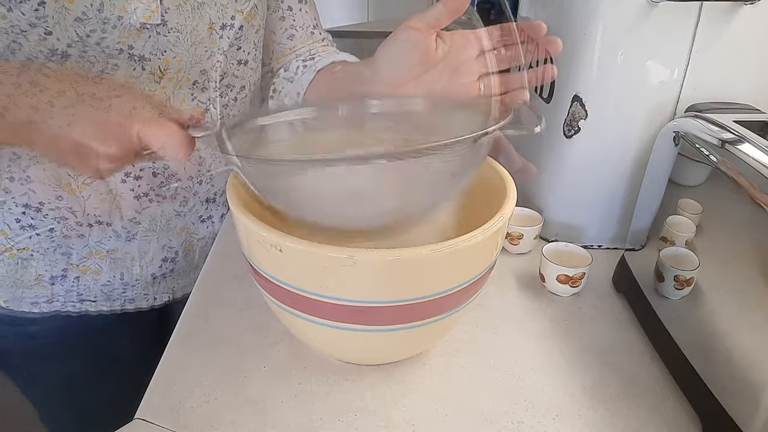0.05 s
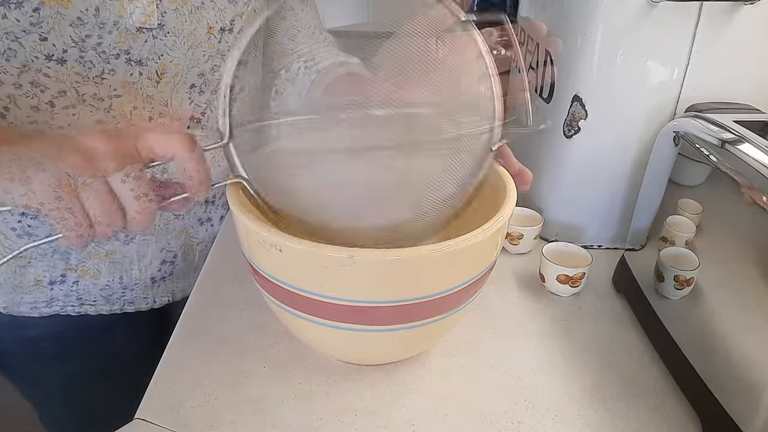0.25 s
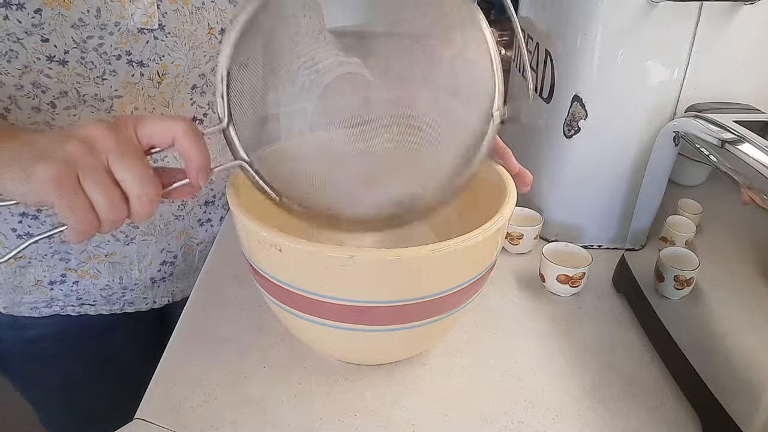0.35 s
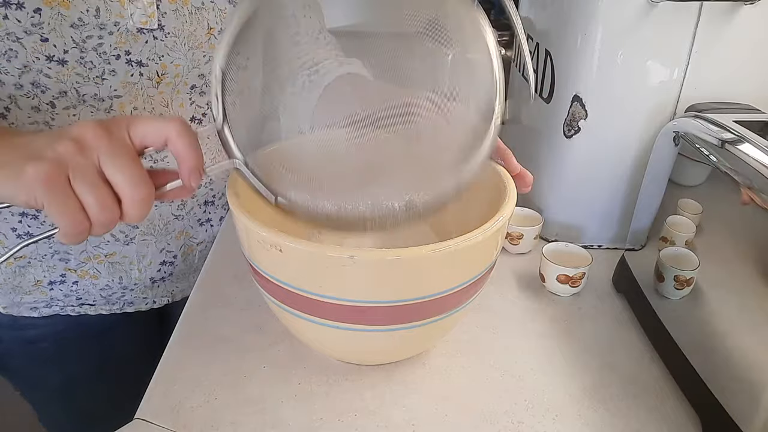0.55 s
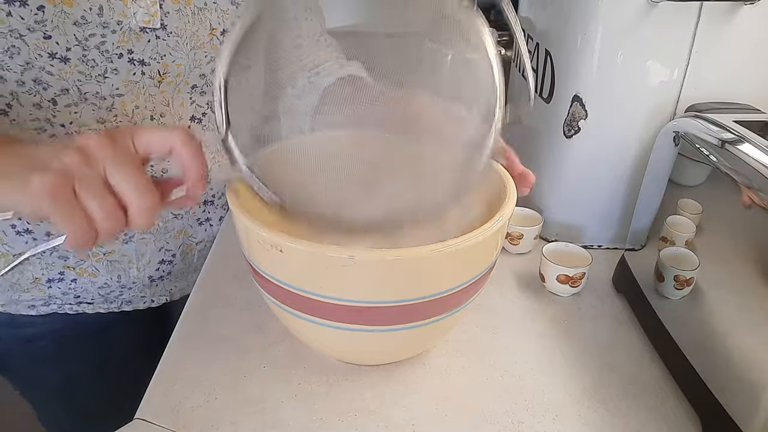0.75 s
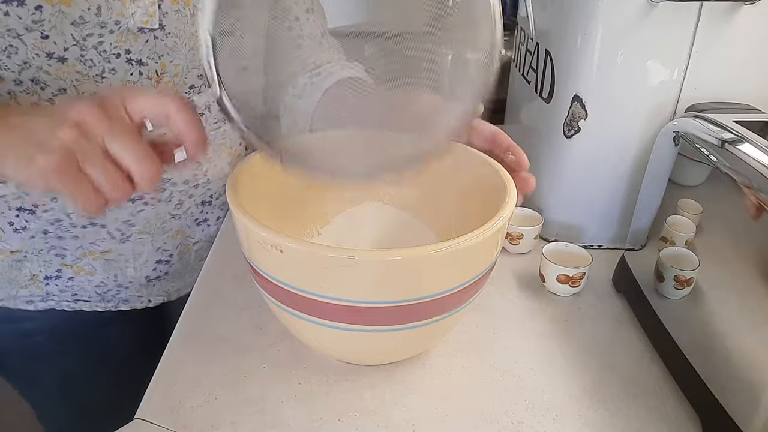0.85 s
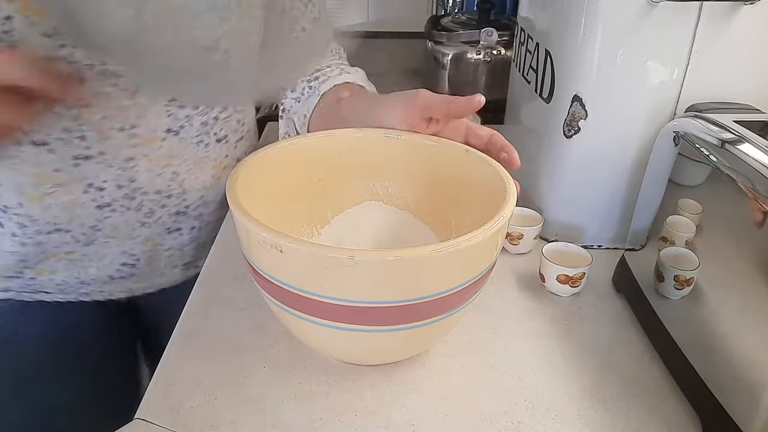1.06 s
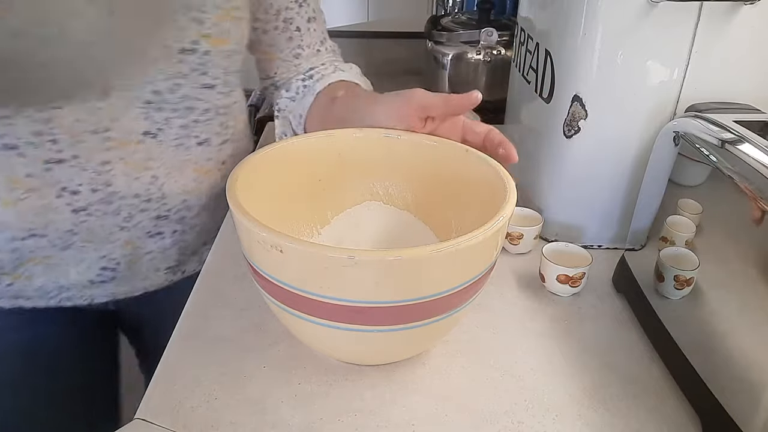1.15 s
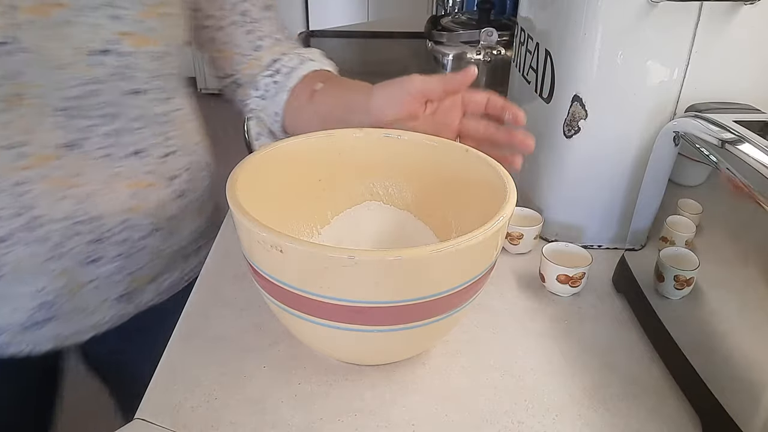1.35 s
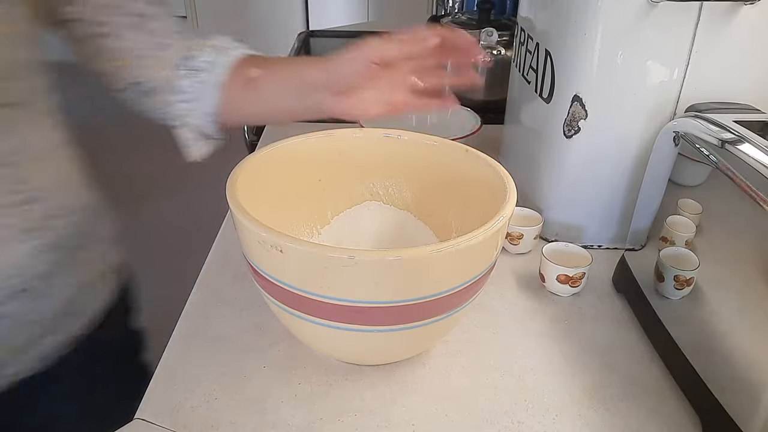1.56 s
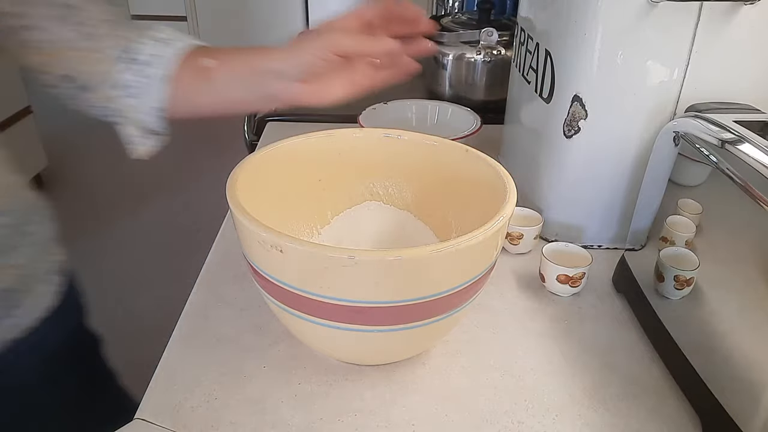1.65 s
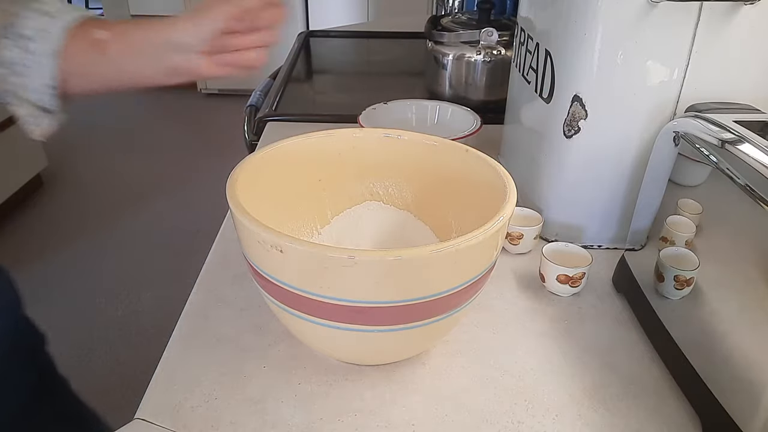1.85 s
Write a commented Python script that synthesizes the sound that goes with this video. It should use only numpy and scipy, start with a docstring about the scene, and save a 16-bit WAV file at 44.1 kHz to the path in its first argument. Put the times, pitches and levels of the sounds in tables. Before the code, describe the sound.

A hand taps the steel rim of a wire mesh sieve three times, each tap louder, with dull thuds and dry rattling mesh, then a barely audible touch and quiet hiss; close microphone in a small kitchen.

```python
"""A soft hiss in a quiet kitchen, then a palm taps the rim of a wire mesh sieve over a bowl:
three times, harder each time, then once barely. Each tap is an impulsive force that excites the
modes of the steel rim, slaps the wire with filtered noise, shakes the mesh into a short dry rattle
of random grains and sets the frame shuddering. Damped sines give dull thuds of hand and frame and,
near 1.8 s, a faint low swell of the background noise; a faint scrape follows the taps as the sieve
is lifted away, and a decaying noise tail rings as the room."""
import sys
import numpy as np
from scipy import signal
from scipy.fft import rfft, irfft
from scipy.io import wavfile

SR = 44100
rng = np.random.default_rng(int(sys.argv[2]) if len(sys.argv) > 2 else 0)


def master_out(mix):
    """Clip the mix to full scale and print it as 16-bit PCM to the path in sys.argv[1]."""
    frames = np.transpose(np.atleast_2d(mix))
    ceiling = np.clip(frames, -1, 1)
    pcm = np.round(ceiling * 32767).astype(np.int16)
    wavfile.write(sys.argv[1], SR, pcm)


N = 83790

# The taps as forces on the rim. Each row: start in seconds, rim level in dB, contact length in seconds,
# rim tuning as a frequency ratio, crack level in dB, mesh rattle level in dB, rattle hold in seconds,
# frame shudder level in dB, shudder t60 in seconds, share of free ring time left by the grip,
# after-touches in dB relative to the contact, top of crack and rattle in Hz, share of force at first touch.
TAPS = [(.1886, -35.5, 0.0055, 0.99, -51, -43.5, 0.055, -35.5, 0.34, 0.59, -6, 5200, 1),
        (0.4296, -30.5, 0.0078, .997, -33.5, -42, 0.036, -30.5, 0.22, 0.67, -5.5, 11000, 0.42),
        (0.6507, -23.5, 0.0071, .995, -24.5, -30, 0.054, -24, 0.26, 0.4, -11.5, 13000, 0.24),
        (0.9233, -74, 0.019, .995, -65.5, -57, 0.039, -52.5, 0.28, 0.9, -6, 5000, 0.97)]


def amp(db):
    """Level law: an amplitude factor is 10 to the power of dB / 20."""
    return 10 ** (np.asarray(db) / 20)


def unit(x):
    """Power normalisation: scales a signal to an rms of 1."""
    return x / np.sqrt(np.mean(x ** 2) + 1e-20)


def at_hz(points, hz):
    """Interpolation along log frequency, where equal ratios are equal steps."""
    points = np.array(points)
    return np.interp(np.log(hz), np.log(points[:, 0]), points[:, 1])


def colour(x, spectrum):
    """Minimum-phase filtering: a folded cepstrum turns a magnitude spectrum into a causal response."""
    bins_hz = np.maximum(np.fft.rfftfreq(2048, 1 / SR), 1)
    log_gain = at_hz(spectrum, bins_hz) * np.log(10) / 20
    cepstrum = irfft(log_gain)
    cepstrum[1:1024] *= 2
    cepstrum[1025:] = 0
    response = irfft(np.exp(rfft(cepstrum)))
    response = response / np.sqrt(np.sum(response ** 2))
    return signal.fftconvolve(x, response)[:len(x)]


def grains(per_s, spread_db):
    """Random impulse process: independent clicks of uneven size and sign, scaled to rms 1."""
    sizes = amp(spread_db * np.minimum(rng.exponential(1, N), 4))
    signed = sizes * rng.choice([-1, 1], N)
    return unit(signed * (rng.random(N) < per_s / SR))


def swell(start, rise, t60, hold=0):
    """Exponential build-up and decay: rises from start; after the hold falls by 60 dB in t60."""
    t = np.maximum(np.arange(N) / SR - start, 0)
    decay = amp(-60 * np.maximum(t - hold, 0) / t60)
    return (1 - np.exp(-t / max(rise, 1e-4))) * decay


def contact(start, length, first):
    """Contact force: jumps to a first share, grows linearly, then falls 25 dB per contact length."""
    t = (np.arange(N) / SR - start) / length
    growth = first + (1 - first) * t
    release = amp(-25 * np.clip(t - 1, 0, 9))
    return np.where(t < 0, 0, np.where(t < 1, growth, release))


def rim():
    """Modal excitation: tiny touches, then looser ones, drive damped modes; the spot sets their shares."""
    # Modes of the steel rim. Each row: frequency in Hz before tuning, free t60 in seconds before the
    # grip shortens it, and level in dB relative to the tap when struck at spot 0, 1 and 2.
    rim_modes = [(847, 0.045, -15, -2.5, -11), (1170, 0.078, 2.5, -3, 2), (1948, 0.18, -3.5, -8, -4.5),
                 (2970, 0.087, -7.5, -15, -24), (3046, 0.081, -15, -11.5, -16),
                 (3750, 0.035, -25, -35, -39), (4220, 0.07, -6, -11, -5.5), (4237, 0.13, -21, -19, -22),
                 (4990, .05, -36, -20, -27), (4940, .05, -32, -21, -22), (6250, .07, -28.5, -13.5, -20),
                 (7040, 0.08, -20.5, -26, -27), (7380, .07, -28, -22, -32), (9360, 0.06, -55, -33, -38),
                 (11040, 0.034, -43, -25.5, -28)]
    # Where on the rim each tap lands, one entry per tap: index of the spot.
    strike_spots = [0, 1, 2, 2]
    after_touch_t60_s = 0.15
    touches = grains(1500, spread_db=3.0)  # touches per second
    out = 0
    for (start, db, length, tuning, *_, grip, after_db, _, first), spot in zip(TAPS, strike_spots):
        after_touches = amp(after_db) * swell(start, length, after_touch_t60_s)
        # The tiny offset keeps the resonator state off subnormal numbers
        drive = touches * (contact(start, length, first) + after_touches) + 1e-18
        for hz, t60, *share_db in rim_modes:
            radius = amp(-60 / (t60 * grip * SR))
            angle = 2 * np.pi * hz * tuning / SR
            poles = [1, -2 * radius * np.cos(angle), radius * radius]
            rung = signal.lfilter([0, np.sin(angle)], poles, drive)
            out = out + amp(db + share_db[spot]) * rung / np.abs(rung).max()
    return out


def crack():
    """Broadband impact noise: the slap of palm on wire follows the contact; softer taps are duller."""
    # Spectrum of the slap. Each row: frequency in Hz, relative density in dB per Hz.
    crack_spectrum = [(300, -35), (700, 2), (1500, -8), (2500, -18.5), (4500, -5.5), (7500, -17),
                      (11000, -31), (16000, -44)]
    noise = rng.standard_normal(N)
    slaps = 0
    for start, _, length, _, db, *_, top_hz, first in TAPS:
        b, a = signal.butter(2, top_hz, fs=SR)
        slaps = slaps + signal.lfilter(b, a, amp(db) * contact(start, length, first) * noise)
    return colour(slaps, crack_spectrum)


def mesh():
    """Stochastic rattle: dense grains in bands swell, hold and decay, the treble mostly soonest."""
    # Bands of the mesh. Each row: centre in Hz, relative level in dB, t60 after the hold in seconds.
    rattle_bands = [(570, -15, 0.74), (1130, 4.5, 0.22), (1850, -1, 0.27), (2780, -0.5, 0.164),
                    (4820, -5, 0.12), (6040, -9, 0.087), (8400, -23.5, 0.28), (13100, -30, 0.14),
                    (15500, -40, .1)]
    rise_s, grains_per_s = 0.032, 3300
    shakes = [grains(grains_per_s, spread_db=3.0) for _ in range(2)]
    out = 0
    for k, (hz, band_db, t60) in enumerate(rattle_bands):
        sos = signal.butter(2, [hz / 1.25, hz * 1.25], "band", fs=SR, output="sos")
        gate = 0
        for start, _, _, _, _, db, hold, *_, top_hz, _ in TAPS:
            treble_loss = 1 + (hz / top_hz) ** 2
            gate = gate + amp(db) * swell(start, rise_s, t60, hold) / treble_loss
        out = out + amp(band_db) * signal.sosfilt(sos, gate * shakes[k % 2])
    return out


def frame():
    """Forced resonance: loose contacts keep the frame and handle shuddering at their low modes."""
    # Frame and handle resonances. Each row: frequency in Hz, bandwidth in Hz, relative level in dB.
    resonances = [(128, 80, -3), (180.6, 69, 6.5), (303, 29, 4), (344.8, 24, -2), (397, 27, -0.5),
                  (466.4, 45.6, 3), (573, 62, 2.5), (712.4, 31, -7), (791, 46, -3.5), (893, 35, -3.5),
                  (1089, 80, -5.5), (1374, 85, -7.5), (1650, 240, -9.5)]
    rise_s, contacts_per_s = 0.013, 800
    shudder = sum(amp(db) * swell(start, rise_s, t60) for start, *_, db, t60, _, _, _, _ in TAPS)
    drive = shudder * grains(contacts_per_s, spread_db=2.5) + 1e-18
    out = 0
    for k, (hz, width_hz, db) in enumerate(resonances):
        radius = np.exp(-np.pi * width_hz / SR)
        # The square root makes up for the power a narrow resonance passes
        zeros = np.array([1, 0, -1]) * (1 - radius * radius) / 2 * np.sqrt(SR / width_hz / 10)
        poles = [1, -2 * radius * np.cos(2 * np.pi * hz / SR), radius * radius]
        sign = (-1) ** k  # neighbouring modes in opposite phase
        out = out + sign * amp(db) * signal.lfilter(zeros, poles, drive)
    return out


def thuds():
    """Damped oscillation: short sines for soft blows of hand and frame, and a faint swell near 1.8 s."""
    # Soft blows of hand and frame, and near 1.8 s a faint low swell of the background noise.
    # Each row: start in seconds, level in dB before the envelope, pitch in Hz,
    # t60 after the hold in seconds.
    damped_sines = [(0.194, -29, 169, 0.036), (0.195, -38.5, 420, 0.047), (.222, -23.5, 195.5, 0.028),
                    (.223, -39, 860, .03), (.228, -38, 1310, 0.021), (0.231, -33, 104, 0.065),
                    (0.257, -43, 90, 0.033), (.247, -32.5, 490, 0.032), (.431, -32, 329, 0.07),
                    (.432, -32, 590, 0.044), (0.439, -24, 187.7, 0.09), (0.434, -34.5, 118, .08),
                    (0.47, -33, 113, 0.083), (0.495, -35, 99.3, 0.087), (0.471, -26.5, 276, 0.029),
                    (0.659, -21, 213, 0.039), (.656, -36, 542, 0.072), (.666, -36, 265, 0.015),
                    (.681, -18, 202.5, 0.077), (0.685, -23, 105, 0.092), (0.69, -18, 323, 0.034),
                    (.696, -29, 785, 0.049), (.704, -21.5, 448, 0.05), (.716, -38, 278, 0.075),
                    (.722, -28.5, 106, 0.038), (0.738, -44, 83, 0.071), (.77, -36.5, 280.5, 0.13),
                    (.927, -49.5, 440, 0.034), (0.939, -49, 324, 0.063), (.943, -51, 636, 0.052),
                    (1.485, -61, 441, 0.14), (1.516, -62, 390, .06), (1.525, -66, 76.5, 0.098),
                    (1.808, -62.5, 323, 0.058), (1.83, -60, 490, 0.054), (1.845, -62.5, 590, 0.062)]
    rise_cycles, hold_cycles = 0.52, 1.06
    t = np.arange(N) / SR
    out = 0
    for start, db, hz, t60 in damped_sines:
        envelope = swell(start, rise_cycles / hz, t60, hold_cycles / hz)
        out = out + amp(db) * envelope * np.sin(2 * np.pi * hz * (t - start))
    return out


def scrape():
    """Friction noise: a faint thin band of rubbing as the sieve is lifted away."""
    centre_hz, width_hz, level_db = 2530, 290, -82
    edges_hz = [centre_hz - width_hz / 2, centre_hz + width_hz / 2]
    sos = signal.butter(2, edges_hz, "band", fs=SR, output="sos")
    rubbing = unit(signal.sosfilt(sos, rng.standard_normal(N)))
    return amp(level_db) * swell(1.075, rise=0.03, t60=0.41, hold=0.1) * rubbing


def kitchen(x):
    """Diffuse reverberation: convolution with octave bands of noise, each dying at its own rate."""
    # Reverberation time of the room. Each row: frequency in Hz, t60 in seconds.
    room_t60 = [(60, 0.05), (125, 0.27), (250, 0.28), (1000, 0.34), (4000, 0.22), (10000, 0.23)]
    level_db, onset_s = -6, 0.018
    t = np.arange(SR // 2 + SR // 4) / SR
    tail = 0
    for hz in 62.5 * 2 ** np.arange(8):
        sos = signal.butter(2, [hz / np.sqrt(2), hz * np.sqrt(2)], "band", fs=SR, output="sos")
        band = signal.sosfilt(sos, rng.standard_normal(len(t)))
        tail = tail + band * amp(-60 * t / at_hz(room_t60, hz))
    tail = tail * (1 - np.exp(-t / onset_s)) / np.sqrt(SR / 40)
    return amp(level_db) * signal.fftconvolve(x, tail)[:N]


def floor():
    """Stationary coloured noise: hiss of room and microphone; its low part swells and sinks a little."""
    # Spectrum of the hiss. Each row: frequency in Hz, relative density in dB per Hz.
    hiss_spectrum = [(12, -27), (20, -31), (63, -1.5), (255, -8), (446, -7), (574, -7), (849, -10),
                     (1150, -14.5), (1440, -16.5), (16000, -26)]
    # Movement of the low part. Each row: time in seconds, gain in dB.
    rumble_gain = [(0, -0.5), (.1, -1), (.18, -1), (1.1, 0.4), (1.45, -0.5), (1.55, 0.5), (1.75, -.5),
                   (1.83, 2), (1.9, 2)]
    level_db, rumble_top_hz = -67, 1200  # level: rms before the low part moves
    hz = np.maximum(np.fft.rfftfreq(N, 1 / SR), 1)
    hiss = rfft(rng.standard_normal(N)) * amp(at_hz(hiss_spectrum, hz))
    low_share = 1 / (1 + (hz / rumble_top_hz) ** 4)
    scale = amp(level_db) / np.std(irfft(hiss, N))
    times, gains_db = np.transpose(rumble_gain)
    movement = amp(np.interp(np.arange(N) / SR, times, gains_db))
    steady = irfft(hiss * (1 - low_share), N)
    return scale * (steady + movement * irfft(hiss * low_share, N))


def scene():
    """Superposition: the direct sounds, their reverberation without deep bass, and the noise floor."""
    direct = rim() + crack() + mesh() + frame() + thuds() + scrape()
    bass_cut = signal.butter(2, 165, "high", fs=SR, output="sos")  # Hz
    sent = signal.sosfilt(bass_cut, direct)
    return (direct + kitchen(sent) + floor())[None]


def record(dry):
    """Band limiting: the microphone loses the deepest bass and the top is cut steeply."""
    bass_cut_hz, cutoff_hz = 57, 16100
    dry = signal.sosfilt(signal.butter(2, bass_cut_hz, "high", fs=SR, output="sos"), dry)
    return signal.sosfilt(signal.cheby2(16, 60, cutoff_hz, fs=SR, output="sos"), dry)


dry = scene()
out = record(dry)
master_out(out)
```